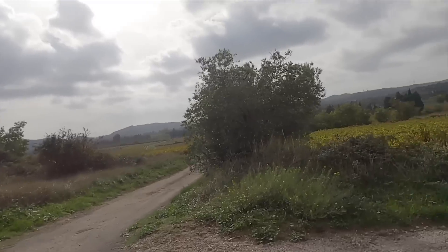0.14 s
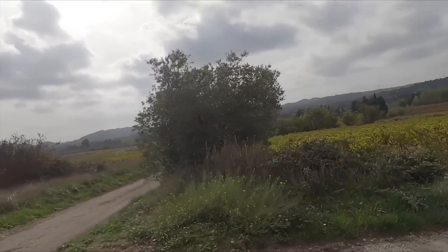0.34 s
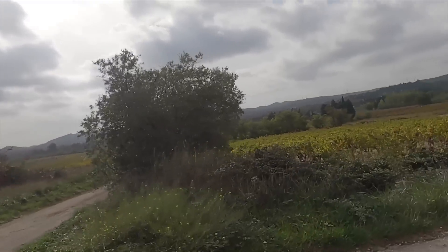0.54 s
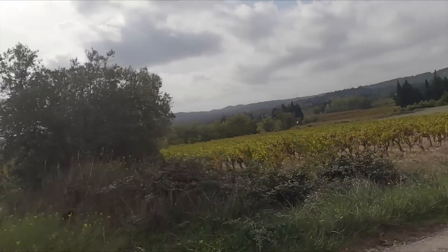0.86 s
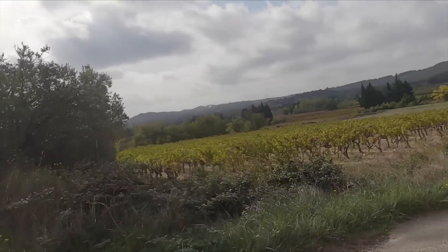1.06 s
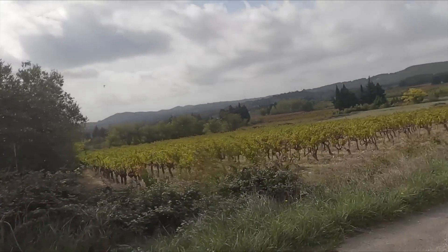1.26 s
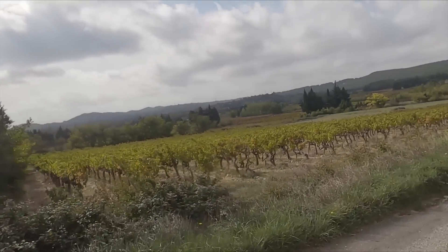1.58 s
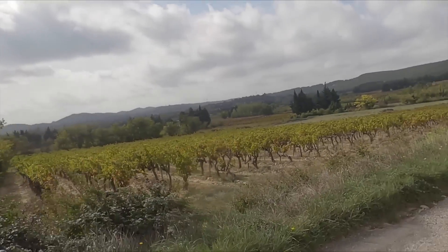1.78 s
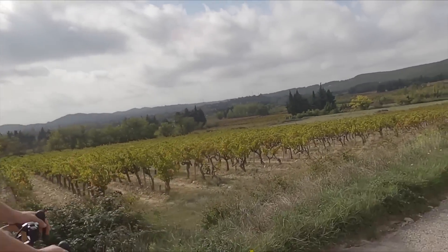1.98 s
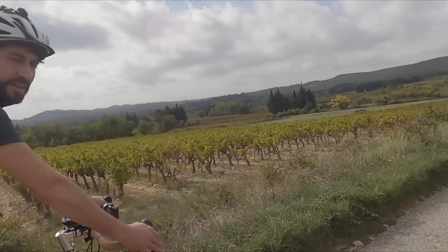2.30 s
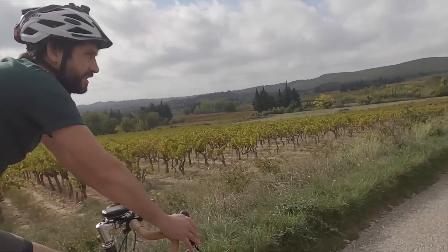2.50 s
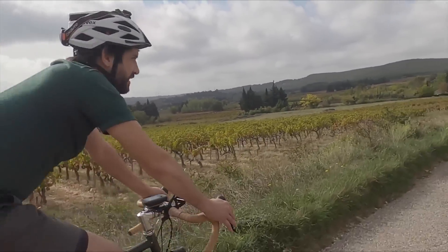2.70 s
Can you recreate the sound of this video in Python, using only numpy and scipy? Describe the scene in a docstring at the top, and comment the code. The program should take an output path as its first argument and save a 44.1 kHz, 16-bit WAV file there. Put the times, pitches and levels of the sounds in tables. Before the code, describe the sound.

A bicycle coasts on a gravel track, its freewheel buzzing with crisp metallic ticks, about forty a second, wavering and quickening towards 2.8 s. Tyres hiss and crunch softly. Wind rumbles low, thumping the microphone around 0.3-0.5 s and 2.5-2.7 s, calmer from 1.4 to 2 s. Stones knock near 0.35, 0.8 and 2.6 s, with sharp flicks at 0.4, 1.55 and 2.1 s. Close, dry, outdoors.

```python
"""On a gravel track, a bicycle coasts past the grit with its freewheel ticking some forty times a second.
Each tick is a click and a burst of pawl chatter ringing the modes of hub and wheel.
The tyres hiss and crunch: shaped noise with small cracking grains. Stones knock, flick and spray as
noise or cracks through resonances. Wind is rumbling and buffeting noise with thumps of a few cycles.
"""
import sys
import numpy as np
from scipy import signal
from scipy.fft import rfft, irfft
from scipy.io import wavfile
from scipy.ndimage import uniform_filter1d

SR = 44100
rng = np.random.default_rng(int(sys.argv[2]) if len(sys.argv) > 2 else 0)


def transcribe(u):
    """Save the signal u as a 16-bit wav file named by the first command-line argument.

    u: samples, shape (n,) or (channels, n), limited to [-1, 1]; the rate is SR.
    q: integer samples, one column per channel.
    """
    v = np.clip(np.atleast_2d(u).T, -1, 1)
    q = np.round(v * 32767).astype(np.int16)
    wavfile.write(sys.argv[1], SR, q)


def natural_amplitude(level_db):
    """Convert a level in decibels to a linear amplitude factor, elementwise."""
    exponent = np.asarray(level_db, float) / 20
    return 10 ** exponent


N = 125685  # length in samples


def evened(x):
    """Scales to rms 1."""
    return x / np.sqrt(np.mean(x ** 2) + 1e-20)


def curve(table, col=1):
    """Draws one column of a time table as straight lines, sample by sample."""
    rows = np.array(table)
    return np.interp(np.arange(N) / SR, rows[:, 0], rows[:, col])


def add(mix, start_s, sound):
    """Mixes a sound in at its start time, cut off at the end of the mix."""
    part = mix[round(start_s * SR):][:len(sound)]
    part += sound[:len(part)]


def resonate(x, pitch_hz, width_hz):
    """A fixed two-pole resonance with a gain of about 1 at its pitch."""
    radius = np.exp(-np.pi * width_hz / SR)
    gain = (1 - radius ** 2) / 2
    poles = [1, -2 * radius * np.cos(2 * np.pi * pitch_hz / SR), radius ** 2]
    return signal.lfilter([gain, 0, -gain], poles, x)


def resonate_twice(x, pitch_hz, width_hz):
    """The same resonance in series with itself, for steeper skirts."""
    return resonate(resonate(x, pitch_hz, width_hz), pitch_hz, width_hz)


def noise(points, patchy_db, shared_db, size):
    """Random short-time spectra with drifting patches and flicker shared by all pitches, at rms 1."""
    bins_hz = np.fft.rfftfreq(size, 1 / SR)
    real, imag, patches = rng.standard_normal((N * 4 // size + 5, len(bins_hz), 3)).T
    shared = evened(uniform_filter1d(patches[0], size=3))
    patches = uniform_filter1d(patches, size=5, axis=0)  # smooth over pitch
    patches = evened(uniform_filter1d(patches, size=5, axis=1))  # smooth over time
    pitch_hz, level_db = np.transpose(points)
    shape_db = np.interp(np.log(bins_hz + 1), np.log(pitch_hz + 1), level_db)[:, None]
    shape_db = shape_db + patchy_db * patches + shared_db * shared
    spectra = (real + 1j * imag) * natural_amplitude(shape_db)
    return evened(signal.istft(spectra, nperseg=size, noverlap=size * 3 // 4)[1][:N])


# pace of the ratchet: start_s [s], tooth_rate [teeth per s]
TOOTH_RATE = [(0.0, 36.67), (0.22, 32.87), (0.36, 44.6), (0.6, 35.69), (0.8, 39.5), (0.88, 47.59),
              (0.94, 43.47), (1.0, 45.28), (1.18, 36.86), (1.44, 43.98), (1.5, 39.73), (1.72, 47.78),
              (1.86, 41.27), (2.32, 49.23), (2.42, 45.02), (2.48, 47.85), (2.54, 38.47), (2.66, 39.16),
              (2.74, 56.81), (2.85, 52.69)]
# loudness of the ticks' body: start_s [s], level_db [dB rms]
BODY_LEVEL = [(0, -42), (.58, -45.5), (.87, -40.5), (2.04, -43), (2.12, -38.5), (2.31, -47), (2.42, -40.5),
              (2.53, -40.5), (2.75, -38.5)]
# loudness of the ticks' treble: start_s [s], level_db [dB rms]
TREBLE_LEVEL = [(0, -56), (.15, -48.5), (.6, -56), (1.4, -51.5), (2.85, -49)]
# lower modes of hub and wheel: pitch_hz [Hz], level_db [dB, relative]
BODY_MODES = [(2800, 1.5), (3170, 3), (3500, 3), (3940, 2.5), (4400, -1), (5000, -11)]
# upper modes of hub and wheel: pitch_hz [Hz], level_db [dB, relative]
TREBLE_MODES = [(6050, 8.5), (6570, 7), (8400, 9), (9250, 3), (10000, -8.5), (10800, -19), (11800, -16.5),
                (12400, -20), (13800, -20.5)]


def freewheel():
    """Pawl clicks, chatter and drag between teeth ring damped modes, each tick with its own colour."""
    snap_s, chatter_t60_s, drag_db = 0.00036, 0.044, -18.5  # drag relative to the chatter
    chatter_spread_db, tick_spread_db, mode_spread_db = 1.5, 1, 2.5
    click_db = 9  # height of the landing click, before the modes
    damping = 0.038  # width of a mode as a share of its pitch
    brighten_db = 12  # rise per second for each octave above 8400 Hz, relative to the other modes

    time_s = np.arange(N) / SR
    teeth = -0.057 + np.cumsum(curve(TOOTH_RATE)) / SR  # starts just short of the first tooth
    draws = rng.standard_normal((200, 2 + len(BODY_MODES + TREBLE_MODES)))
    tick_s = np.interp(np.arange(int(teeth[-1]) + 1), teeth, time_s)
    tooth = np.maximum(np.searchsorted(tick_s, time_s) - 1, 0)
    age_s = np.abs(time_s - tick_s[tooth])

    decay_db = -60 * age_s / chatter_t60_s + tick_spread_db * draws[tooth, 1]
    burst = (1 - np.exp(-age_s / snap_s)) ** 2 * natural_amplitude(decay_db)
    unevenness = evened(uniform_filter1d(rng.standard_normal(N), size=30))
    burst = burst * natural_amplitude(chatter_spread_db * unevenness)
    # one-sample clicks, from the second tooth on
    click = natural_amplitude(click_db + tick_spread_db * draws[tooth, 0]) * np.diff(tooth, prepend=0)

    out = np.zeros(N)
    column = 2  # each mode has its own column of draws
    for level, modes in ((BODY_LEVEL, BODY_MODES), (TREBLE_LEVEL, TREBLE_MODES)):
        part = np.zeros(N)
        for pitch_hz, level_db in modes:
            strength = burst * natural_amplitude(mode_spread_db * draws[tooth, column]) + natural_amplitude(drag_db)
            drive = strength * rng.standard_normal(N)
            drive = drive + (-1) ** column * click  # clicks alternate in sign from mode to mode
            tilt_db = brighten_db * max(np.log2(pitch_hz / 8400), 0) * time_s
            part += natural_amplitude(level_db + tilt_db) * resonate(drive, pitch_hz, damping * pitch_hz)
            column += 1
        out += natural_amplitude(curve(level)) * evened(part)
    return out


# stones knocked by the tyre: start_s [s], level_db [dB rms before rise and decay], pitch_hz [Hz]
STONE_KNOCKS = [(.328, -22, 850), (0.354, -24, 850), (0.507, -30, 870), (0.795, -27.5, 910),
                (.846, -27.5, 1360), (2.452, -30, 1450), (2.574, -29.5, 825), (2.634, -32, 1130),
                (2.668, -38, 1000), (2.733, -31, 1010)]
# sharp ticks of flicked stones: start_s [s], peak_db [dB], pitch_hz [Hz]
STONE_FLICKS = [(0.4200, -17.5, 4000), (.8683, -24, 3620), (1.1697, -24.5, 3440), (1.5400, -28, 3400),
                (1.5524, -23, 3600), (2.0947, -27.5, 1470), (2.1194, -19.5, 1880)]
# sprays of gravel under the tyre: start_s [s], length_s [s], level_db [dB rms over length], pitch_hz [Hz]
GRAVEL_SPRAYS = [(.632, .022, -40, 1700), (.785, .028, -36, 2000), (.834, .024, -39, 3800),
                 (2.113, .016, -35, 3600), (1.531, .026, -35, 2900)]


def stones():
    """Knocks and flicks are decaying noise in a broad resonance; sprays are ringing clusters of cracks."""
    rise_s, knock_t60_s, flick_t60_s = 0.0017, 0.075, 0.011
    width, spray_width = 0.73, 0.5  # width of a resonance as a share of its pitch
    cracks_per_s = 1600
    top_ratio, top_db = 3.2, -22  # a spray's upper resonance: multiple of its pitch, gain

    out, t = np.zeros(N), np.arange(0, .12, 1 / SR)
    for start_s, level_db, pitch_hz in STONE_KNOCKS:
        crackle = rng.standard_normal(len(t)) * rng.exponential(size=len(t))
        ring = evened(resonate_twice(crackle, pitch_hz, width * pitch_hz))
        envelope = (1 - np.exp(-t / rise_s)) * natural_amplitude(level_db - 60 * t / knock_t60_s)
        add(out, start_s, ring * envelope)
    for start_s, peak_db, pitch_hz in STONE_FLICKS:
        puff = rng.standard_normal(len(t)) * natural_amplitude(-60 * t / flick_t60_s)
        ring = resonate_twice(puff, pitch_hz, width * pitch_hz)
        add(out, start_s, natural_amplitude(peak_db) * ring / abs(ring).max())
    for start_s, length_s, level_db, pitch_hz in GRAVEL_SPRAYS:
        size, chance = rng.standard_normal(len(t)), rng.random(len(t))
        cracks = size * (chance < cracks_per_s / SR) * (t < length_s)
        spray = resonate_twice(cracks, pitch_hz, spray_width * pitch_hz)
        spray += natural_amplitude(top_db) * resonate(cracks, top_ratio * pitch_hz, pitch_hz)
        # the square root refers the level to the spray's own length
        add(out, start_s, natural_amplitude(level_db) * evened(spray) * np.sqrt(length_s / t[-1]))
    return out


# colour of the tyre hiss: pitch_hz [Hz], level_db [dB per Hz, relative]
HISS_COLOUR = [(450, -3.5), (2240, -5.5), (3880, -11.5), (5280, -17), (8640, -33), (13000, -64)]
# wind and tyre levels: start_s [s], rumble_db [dB rms], buffet_db [dB rms], hiss_db [dB rms]
WIND_AND_TYRES = [(0, -20, -40.5, -44.5), (.2, -22, -34.5, -43.5), (.33, -16.5, -25, -39.5),
                  (.49, -18.5, -29, -39.5), (.56, -25.5, -39, -47), (.72, -21.5, -31.5, -41),
                  (.92, -26, -37, -40), (1.04, -32, -54.5, -49), (1.13, -25.5, -37.5, -38),
                  (1.33, -24, -39, -44), (1.41, -31.5, -43, -45), (1.96, -29.5, -39, -45.5),
                  (2.3, -24, -40, -44.5), (2.43, -29, -39.5, -48.5), (2.52, -16.5, -35.5, -41),
                  (2.75, -20, -29.5, -38.5), (2.85, -20, -32.5, -43.5)]


def tyres():
    """Rolling hiss with small grains of grit cracking under the tread as short decaying rings."""
    grains_per_s, crunch_db = 250, -11  # average rate; level relative to the hiss
    hiss = noise(HISS_COLOUR, patchy_db=1.5, shared_db=2.5, size=256)
    size = rng.standard_normal(N) * (rng.random(N) < grains_per_s / SR)
    kind = rng.integers(0, 16, N)
    t, grains = np.arange(600) / SR, np.zeros(N)
    for k, pitch_hz in enumerate(np.geomspace(650, 2300, num=16)):
        cycles = t * pitch_hz
        grain = cycles * np.exp(-cycles / 1.35) * np.sin(2 * np.pi * cycles)
        grains += signal.oaconvolve(size * (kind == k), grain)[:N]
    return natural_amplitude(curve(WIND_AND_TYRES, 3)) * (hiss + natural_amplitude(crunch_db) * evened(grains))


# colour of the rumble: pitch_hz [Hz], level_db [dB per Hz, relative]
RUMBLE_COLOUR = [(7.1, -37), (12, 3), (65, 2), (123, -2), (162, -10), (260, -19.5), (400, -63)]
# colour of the buffeting: pitch_hz [Hz], level_db [dB per Hz, relative]
BUFFET_COLOUR = [(94, -14), (160, -1), (431, -10), (667, -25.5), (800, -19), (1040, -77)]
# puffs that thump the microphone: start_s [s], peak_db [dB, of the envelope], pitch_hz [Hz]
WIND_THUMPS = [(.328, -10.5, 285), (0.397, -16, 370), (0.442, -15.5, 286), (0.461, -17.5, 475),
               (2.533, -18, 270), (2.564, -17.5, 334), (2.629, -18.5, 325)]


def wind():
    """Lumpy rumble, a flickering buffet above it, and single thumps of a few cycles."""
    cycles = 3  # length of a thump
    out = natural_amplitude(curve(WIND_AND_TYRES, 1)) * noise(RUMBLE_COLOUR, patchy_db=2.0, shared_db=-0.14, size=2048)
    out += natural_amplitude(curve(WIND_AND_TYRES, 2)) * noise(BUFFET_COLOUR, patchy_db=3.0, shared_db=3.0, size=512)
    for start_s, peak_db, pitch_hz in WIND_THUMPS:
        u = np.arange(0, 1, pitch_hz / cycles / SR)  # share of the thump gone by
        envelope = np.sin(np.pi * u ** 0.42) ** 2  # rises faster than it falls
        add(out, start_s, natural_amplitude(peak_db) * envelope * np.sin(2 * np.pi * (cycles * u + rng.random())))
    return out


def scene():
    """All sources at the one microphone."""
    return (freewheel() + stones() + tyres() + wind())[None]


# treble roll-off of the finished mix, steep above 12300 Hz: pitch_hz [Hz], gain_db [dB]
TREBLE_ROLL_OFF = [(12300, 1.5), (12900, -10), (15000, -12.5), (15500, -35)]


def flatten_and_roll_off(dry):
    """Strong gusts are flattened by a soft limit, then the top is rolled off."""
    overload = 0.32  # level at which the capsule flattens out
    flattened = overload * np.tanh(dry / overload)
    pitch_hz, gain_db = np.transpose(TREBLE_ROLL_OFF)
    roll_off_db = np.interp(np.fft.rfftfreq(N, 1 / SR), pitch_hz, gain_db)
    return irfft(rfft(flattened) * natural_amplitude(roll_off_db), N)


def low_pass(x):
    """Removes everything above the highest recorded frequency."""
    return signal.sosfilt(signal.butter(12, 15700, fs=SR, output="sos"), x)


def record(dry):
    """Strong gusts flattened and the top rolled off, made into the finished sound."""
    mix = flatten_and_roll_off(dry)
    return low_pass(mix)


dry = scene()
out = record(dry)
transcribe(out)
```